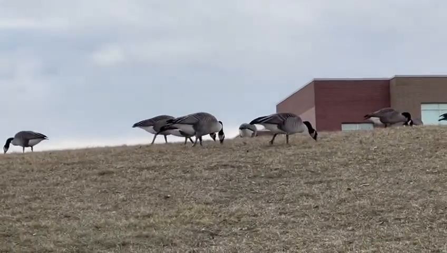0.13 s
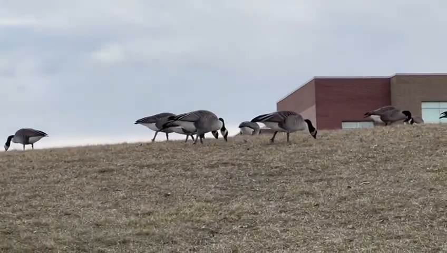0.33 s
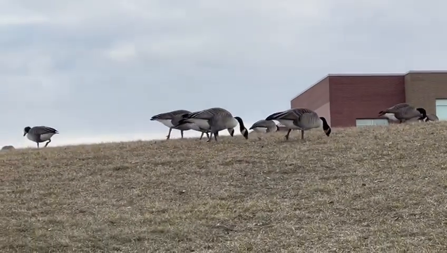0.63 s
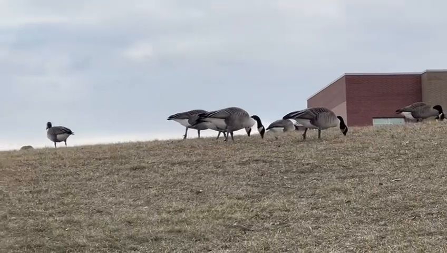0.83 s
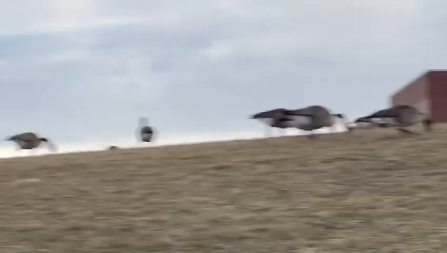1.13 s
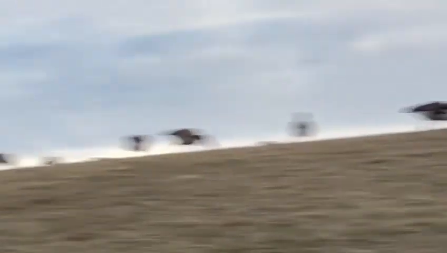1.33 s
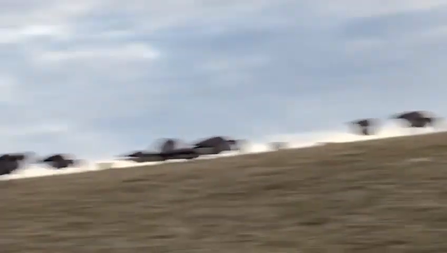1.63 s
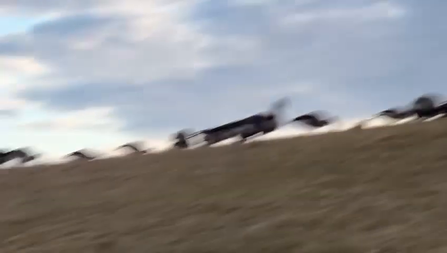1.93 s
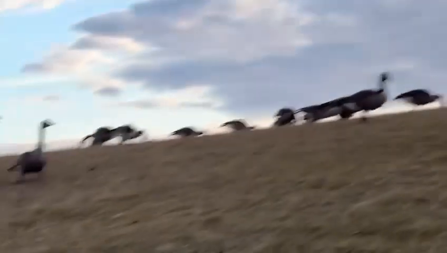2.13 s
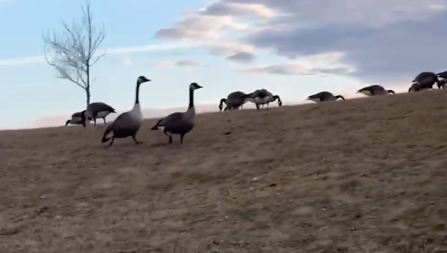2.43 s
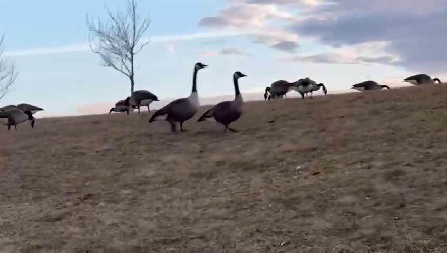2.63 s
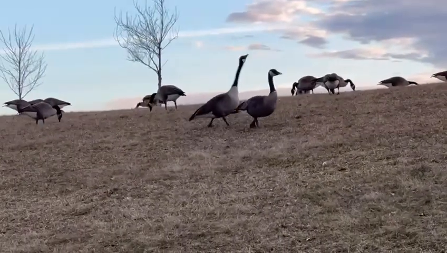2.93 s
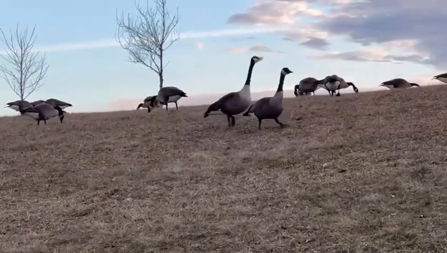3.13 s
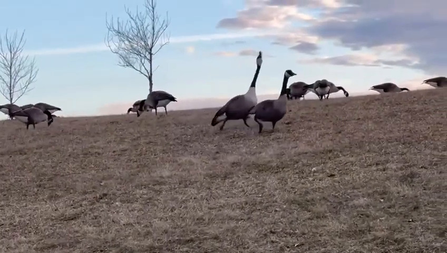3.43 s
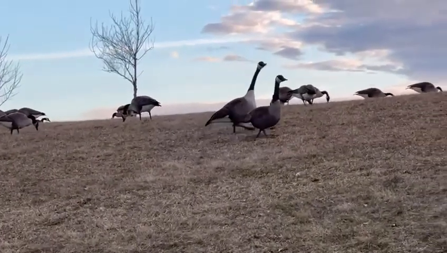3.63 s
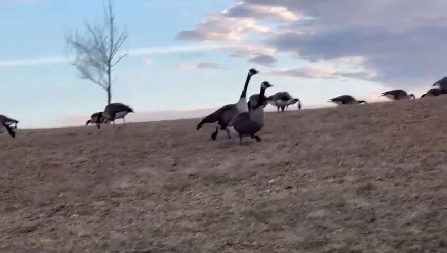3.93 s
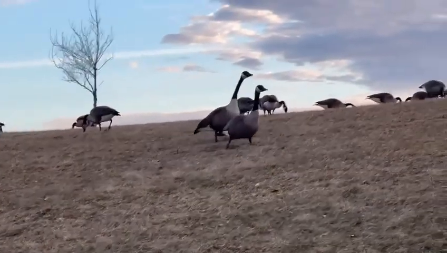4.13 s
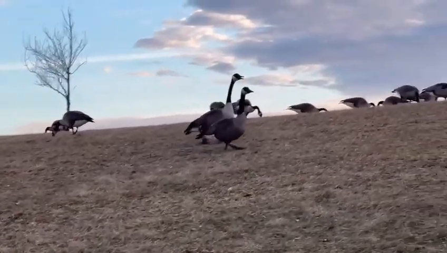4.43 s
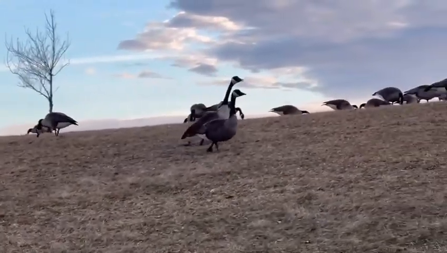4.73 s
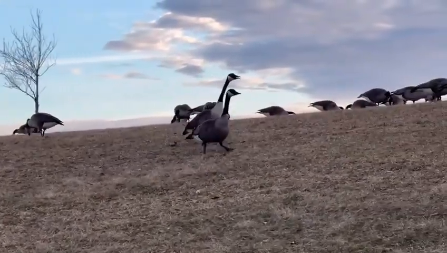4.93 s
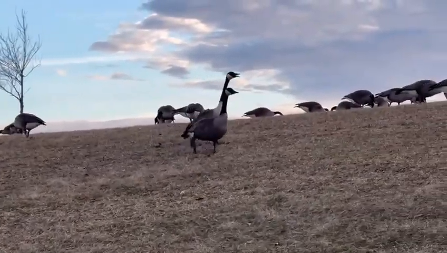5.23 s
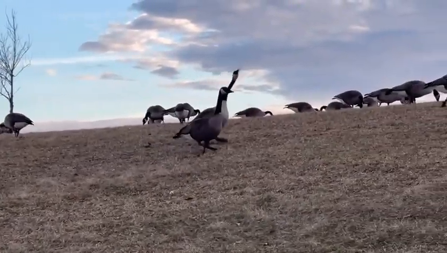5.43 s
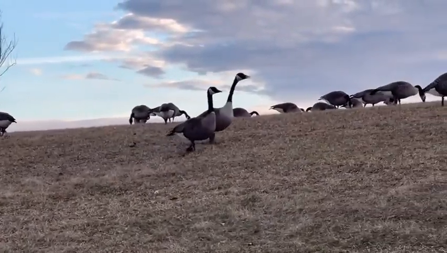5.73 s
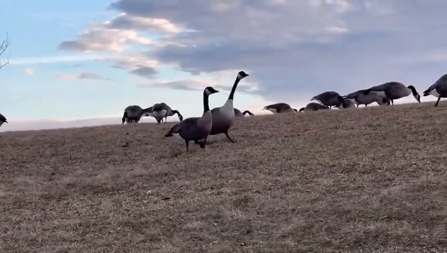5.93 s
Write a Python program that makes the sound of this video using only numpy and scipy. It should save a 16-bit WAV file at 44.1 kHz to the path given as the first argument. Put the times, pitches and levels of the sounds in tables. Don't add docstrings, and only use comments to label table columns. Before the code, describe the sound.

Outdoors on a dry lawn, a steady low rumble of far traffic and faint town murmur run throughout, the rumble rising very slightly. A goose honks at about 0.3, 0.7, 1.1, 1.6, 2.3, 2.7, 3.1, 3.4, 4.0, 4.4, 4.8, 5.2 and 5.7 seconds: each a short low rattling tone cracking up into a brief clear arched note. The honks are weaker around 2.3, then fuller and brighter. Faint dull echoes follow. Its mate's quiet, slow-pulsed grunts fill gaps before 1 second and again from 2.5 to 5.9. The geese sit left at first, shifting near centre by 2.3. Grass snaps and rustles from 1.3, densest at 3.2-4.0, then sparser until 5.4. A weak wind gust spans 1.3-1.85, with soft handling knocks at 1.4 and 2.25; a stronger, low gust hits the hand-held stereo microphone around 5.8-6.0.

```python
import sys
import numpy as np
from scipy import signal
from scipy.io import wavfile
from scipy.ndimage import uniform_filter1d

SR = 44100
rng = np.random.default_rng(int(sys.argv[2]) if len(sys.argv) > 2 else 0)


def store_pcm(level_fs):
    pcm = np.round(np.clip(level_fs, -1, 1) * 32767).astype(np.int16)
    wavfile.write(sys.argv[1], SR, np.atleast_2d(pcm).T)


def voltage_ratio(decibels):
    exponent = np.asarray(decibels, float) / 20
    return 10 ** exponent


N = 267731

# low start [t/s], voice breaks [t/s], clear note length [s], top pitch [f/Hz], [level/dB]
HONKS = [(0.297, 0.353, 0.052, 655, -34.5), (0.683, 0.741, 0.066, 659.6, -30.5),
         (1.083, 1.14, 0.057, 661, -30.5), (1.644, 1.707, 0.061, 621, -33),
         (2.277, 2.345, 0.047, 611.6, -35.5), (2.71, 2.767, 0.069, 654.5, -27.5),
         (3.058, 3.107, .087, 666.5, -26), (3.443, 3.492, 0.077, 671.2, -27),
         (3.985, 4.055, 0.083, 637.4, -29), (4.4, 4.455, 0.071, 654.7, -27),
         (4.843, 4.913, 0.071, 666, -26), (5.239, 5.294, 0.077, 665, -24),
         (5.677, 5.732, 0.071, 647.7, -27.5)]


def rms_one(x):
    return x / np.sqrt(np.mean(x ** 2) + 1e-20)


def butter(x, order, hz, kind="low"):
    return signal.sosfilt(signal.butter(order, hz, kind, fs=SR, output="sos"), x)


def resonance(x, hz, width_hz):
    r = np.exp(-np.pi * width_hz / SR)
    poles = [1, -2 * r * np.cos(2 * np.pi * hz / SR), r * r]
    return signal.lfilter(np.array([1, 0, -1]) * (1 - r * r) / 2, poles, x)


def in_time(rows):
    s, *columns = np.transpose(rows)
    return [np.interp(np.arange(N) / SR, s, c) for c in columns]


def at_hz(points, hz):
    points = np.array(points)
    return np.interp(np.log(hz), np.log(points[:, 0]), points[:, 1])


def drift(rate_hz):
    r = np.exp(-80 * np.pi * rate_hz / SR)
    slow = signal.lfilter([1], [1, -2 * r, r * r], rng.standard_normal(N // 40 + 2002))[2000:]
    return np.interp(np.arange(N) / 40, np.arange(len(slow)), rms_one(slow))


def calls(tables, tail_s):
    t = np.arange(N) / SR
    gate = np.zeros(N)
    held = []
    for rows in tables:
        opening = (t - rows[0][0]) / 0.0064
        closing = (rows[-1][0] - t) / tail_s
        gate += np.clip(np.minimum(opening, closing) + 1, 0, 1)
        held += [*rows, (rows[-1][0] + tail_s, *rows[-1][1:])]
    return in_time(held), gate


def rattle(per_s, throat, jitter, uneven_db, breath, follow):
    cycle = np.cumsum(per_s * (1 + jitter * drift(90))) / SR
    third = np.floor(3 * cycle)
    slaps = np.diff(third, prepend=0) * follow ** (third % 3) * voltage_ratio(uneven_db * rng.standard_normal(N))
    puffs = breath * np.exp(-1.8 * (cycle % 1)) * rng.standard_normal(N)
    joined = np.zeros(N)
    for k, (hz, width_hz, db) in enumerate(throat):
        rung = resonance(slaps + puffs * hz / 1500, hz, width_hz)
        rung = resonance(rung, hz, 1.64 * width_hz)
        joined += (-1) ** k * voltage_ratio(db) * rms_one(rung)
    return rms_one(butter(joined, 4, 7600))


def honk_starts():
    # pitch [f/Hz], opening [level/dB], rattle at break over note [dB],
    # gathers before break [s], open-bill hiss [dB]
    low = [(469, -38, 0.5, 0.0097, 7), (469, -43, -4.5, 0.013, 1), (475, -39, -4.5, 0.0068, 1),
           (476.4, -38, -.6, 0.014, 2.5), (474, -39.5, 2, 0.013, -5), (483, -36.5, -2.5, 0.0055, -2),
           (484.3, -32.5, -3.5, .016, 3), (482, -28.5, -3.5, 0.0089, 3), (468, -38, -1.5, 0.018, -1),
           (468, -36.5, -2.2, 0.011, -2.5), (486, -36, -5.5, 0.016, -1.2), (487, -35, -6.5, 0.0081, -0.5),
           (471.4, -32, -0.5, 0.012, 0.8)]
    # [f/Hz], width [Hz], [level/dB]
    throat = [(562, 151, -8), (1176, 160, 8), (1955, 395, -4), (4270, 1550, -7.5), (6600, 7700, -34.5)]
    partials_db = [-3.5, -8, -18, -17, -19.5]
    open_s, snap_s = 0.0057, 0.0024
    slack_db_per_s, gather_db = -300, -3
    slackens = .45
    tables = []
    for (s, crack_s, _, _, note_db), (hz, db, rise_db, lead_s, hiss_db) in zip(HONKS, low):
        tone_db = -39 + 0.27 * (db + 34)
        gather_s = crack_s - lead_s
        slack_db = slack_db_per_s * max(gather_s - s - .02, 0)
        top_db = note_db + rise_db
        slack_s = s + 0.0023 + open_s + slackens * (gather_s - s - .015)
        rows = [(s + .003, tone_db - 8.5, db - 1.2),
                (s + 0.0048 + open_s, tone_db, db + 1.0),
                (slack_s, tone_db, db + 0.68 * slack_db),
                (gather_s - snap_s, tone_db + 0.26 * slack_db, db + slack_db),
                (gather_s, tone_db, top_db + gather_db),
                (crack_s + .002, tone_db - 1.5, top_db)]
        tables.append([(t, hz * (.95 + .064 * (t - s) / (crack_s - s)), a, b, hiss_db) for t, a, b in rows])
    (pitch_hz, tone_db, rattle_db, hiss_db), gate = calls(tables, tail_s=.014)
    phase = 2 * np.pi * np.cumsum(pitch_hz * (1 + 0.01257 * drift(68.4))) / SR
    tone = sum(voltage_ratio(db + 2.86 * drift(180)) * np.cos(k * phase) for k, db in enumerate(partials_db, 1))
    rough = rattle(pitch_hz / 3, throat, jitter=.09, uneven_db=3, breath=.13, follow=.55)
    rough = rough + (voltage_ratio(hiss_db) - 1) * butter(rough, 2, 3300, "high")
    return gate * (np.sqrt(2) * voltage_ratio(tone_db) * tone + voltage_ratio(rattle_db + 1.0) * rough)


def honk_notes():
    partials_db = [-16.5, 0.5, -5, -22, -27.5, -12.5, -12.5, -16, -25, -23, -23.5, -35, -36, -36, -31.5,
                   -41.5, -44.5, -58.5]
    # [share of length], [pitch factor], [share of early sag], [level/dB]
    note_shape = [(0, .98, 0.19, -8.5), (.15, .998, 0, -0.96), (.42, 1.001, 0.44, -0.5),
                  (0.678, .999, 1.08, -2), (.86, 0.917, 0.35, -4.5), (1.001, .87, .6, -18.5)]
    # early sag [%], bill towards us [dB], partial 3 [dB], 4-5 [dB], 6 [dB]
    pose = [(3.9, 0, 4, 0.49, 7), (1.1, 12, 4, 0.35, 12), (3.3, 3.5, 3, .3, 7), (5.4, -1.5, -4.5, .3, -0.5),
            (4.94, -1.5, -4, 0.28, 0), (0.88, 5.5, -1, .3, 9), (0.42, 14.5, -0.3, .3, 9.5),
            (1.1, 2.5, -2.5, .3, -2.5), (5.65, -0.3, -2, .3, -9), (2.3, -3, -0.3, 0.27, -6),
            (4.85, 2.1, .3, .3, 2.5), (0.81, 1.5, -2.5, .3, 4), (3.2, 3.5, -0.5, .3, 2)]
    aim_share = (.55, 0.87, 1.44)
    overtones_die_db = 30
    out = np.zeros(N)
    air = rms_one(resonance(resonance(rng.standard_normal(N), 3670, 4400), 4000, 4682))
    tremble = 1 + .004 * drift(150)
    spread_rad = .05
    ragged = rms_one(butter(rng.standard_normal((3, N)), 2, [60, 330], "band"))
    share, factor, sagging, shape_db = np.transpose(note_shape)
    for (_, crack_s, length_s, hz, db), (early, facing_db, *neck_db) in zip(HONKS, pose):
        s = crack_s + share * length_s
        colour_db = [*neck_db, *np.multiply(aim_share, facing_db)]
        turn_db = np.repeat([0, *colour_db], [2, 1, 2, 1, 2, 3, 7])
        hoarse = .2 + .009 * max(665 - hz, 0)
        at = np.arange(round((s[0] - .004) * SR), round((s[-1] + 0.011) * SR))
        t = at / SR
        edge = np.clip(np.minimum(at - at[0], at[-1] - at) / (0.011 * SR), 0, 1)
        bend_hz = uniform_filter1d(np.interp(t, s, hz * (factor - sagging * early / 100)), size=300)
        level_db = uniform_filter1d(np.interp(t, s, db + shape_db), size=200)
        phase = 2 * np.pi * np.cumsum(bend_hz * tremble[at]) / SR
        sag = np.minimum(bend_hz / bend_hz.max() - 1, 0) * (at > at[bend_hz.argmax()])
        age_s = np.maximum(t - s[1] - .01, 0)
        swell_db = (level_db - level_db.max()) * (at < at[level_db.argmax()])
        for k, partial_db in enumerate(partials_db, 1):
            sway_db = .15 * k * np.interp(at, np.linspace(at[0], at[-1], 9), rng.standard_normal(9))
            fading_db = (overtones_die_db * k - 60 * (k == 1)) * sag
            fading_db = fading_db - 30 * max(k - 7, 0) * age_s + 0.12 * k * swell_db
            flutter = 1 + hoarse * min(k / 7, 1) ** 2 * ragged[k % 3, at]
            gain = voltage_ratio(level_db + 5.0 + partial_db + turn_db[k - 1] + sway_db + fading_db)
            out[at] += edge * flutter * gain * np.cos(k * phase - spread_rad * k * k)
        break_db = 14 * np.exp(-((t - s[1] + 0.0013) / 0.02) ** 2)
        air_db = level_db.max() - 36.5 + break_db + colour_db[4] - 160 * age_s
        out[at] += edge * voltage_ratio(air_db) * (1 + np.cos(phase)) * air[at]
    return out


def grunts():
    # start [t/s], length [s], [level/dB], fades by [dB], pulse rate [f/Hz]
    grunt_rows = [(0.038, 0.066, -52.5, 16, 164), (0.243, 0.041, -57.5, -9, 150),
                  (0.503, 0.083, -50.5, 12.5, 158), (0.863, .061, -48, 7, 152), (2.537, .08, -47, 6.5, 145),
                  (2.901, .074, -41, 8.5, 166), (3.285, .058, -38.5, 4.5, 163), (4.204, .064, -43, 3, 159),
                  (4.674, 0.091, -48, 0.5, 154), (5.052, .064, -43, 6, 149), (5.887, .068, -44.5, 3, 157)]
    # [f/Hz], width [Hz], [level/dB]
    throat = [(444, 285, -3), (1345, 320, 1), (2144, 1000, -11.5), (4840, 1800, -19.5)]
    tables = []
    for s, length_s, db, fade_db, hz in grunt_rows:
        swell = np.clip(.3 + 0.06 * (db + 46), .08, .6)
        tables.append([(s, db - 12, hz), (s + swell * length_s, db, hz), (s + length_s, db - fade_db, .96 * hz)])
    (level_db, per_s), gate = calls(tables, tail_s=.014)
    pulses = rattle(per_s, throat, jitter=.012, uneven_db=1.2, breath=.05, follow=.3)
    opened = resonance(pulses, 3230, 960) + 0.72 * resonance(pulses, 5600, 2200)
    facing_db = -2 - 3 * np.arange(N) / SR
    return gate * voltage_ratio(level_db + 0.76) * (pulses + 1.6 * voltage_ratio(facing_db) * opened)


def aside(geese):
    # [t/s], side [left 1, right -1]
    bearing = [(0, 1), (1.2, 1), (2.3, .16), (3.2, .24), (6.07, 0.083)]
    ported = resonance(geese, 1130, 990) + 0.033 * resonance(geese, 550, 400)
    ported = ported - .5 * resonance(geese, 2100, 480)
    return in_time(bearing)[0] * ported * [[.35], [-1]]


def echoes(x):
    # delay [t/s], [level/dB]
    returns = [
        (0.091, -29.5),
        (0.114, -46),
        (.15, -37.5),
        (.185, -40.5),
        (.225, -49.5),
        (.27, -48),
    ]
    reply = np.zeros((2, round(.36 * SR)))
    t = np.arange(1500) / SR
    for s, db in returns:
        i = round(s * SR)
        reply[:, i:i + 1500] += voltage_ratio(db - 28.5) * rng.standard_normal((2, 1500)) * np.exp(-t / 0.015)
        reply[[0, 1], [i, i + 9]] += voltage_ratio(db)
    far = resonance(resonance(x, 1320, 450), 1320, 900) + .08 * x
    near = voltage_ratio(-61.0) * rng.standard_normal(3000) * np.exp(-np.arange(3000) / SR / 0.12)
    walls = signal.fftconvolve(far[None], reply, axes=1)[:, :N]
    return walls + signal.fftconvolve(resonance(x, 6000, 3600), near)[:N]


def snaps():
    # [t/s], peak [level/dB], centre [f/Hz]
    stiff = [(1.2704, -46.5, 7640), (1.64, -43, 8040), (1.654, -45, 5610), (1.6864, -37, 5830),
             (1.9655, -41.5, 6600), (2.169, -38.5, 7900), (2.209, -44.5, 7050), (2.4487, -45, 7940),
             (2.5347, -39, 7500), (3.2052, -41, 6790), (3.2881, -41, 8045), (3.405, -38, 7380),
             (3.4125, -42, 8040), (3.7083, -44.5, 7740), (3.724, -43, 7300), (3.739, -41, 7640),
             (3.7651, -38, 6900), (3.8016, -42.5, 7840), (3.815, -44.5, 6400), (3.8302, -40.5, 7400),
             (3.8368, -39, 7640), (3.9522, -41.5, 7260), (3.9733, -33, 7760), (3.9911, -36.5, 6220),
             (4.5986, -40.5, 9160), (4.654, -38, 8350), (4.7876, -37, 6400), (4.804, -40.5, 5897),
             (5.1737, -46, 6090), (5.445, -41.5, 8050)]
    # [t/s], peak [level/dB]
    further = [(1.44, -55), (1.517, -53.5), (1.857, -54.5), (2.0311, -52.5), (2.092, -55), (2.1166, -49),
               (2.383, -38), (2.4202, -53), (2.5277, -48), (2.5433, -49), (2.5679, -48.5), (2.5766, -46.5),
               (2.5953, -47), (2.9976, -47), (3.0104, -49), (3.0259, -52), (3.0783, -44), (3.2247, -49.5),
               (3.2805, -45), (3.3483, -47), (3.6152, -49), (3.654, -49), (3.7344, -39), (3.7558, -47),
               (3.7943, -46), (3.9222, -52), (3.9335, -45), (4.13, -48), (4.5466, -54), (4.7534, -46.5)]
    out = np.zeros(N)
    t = np.arange(500) / SR
    breaks = [*stiff, *[(s, db, 6900 + 400 * rng.standard_normal()) for s, db in further]]
    for s, db, hz in breaks:
        burst = rng.standard_normal(500) * (np.exp(-t / 0.00023) + 0.31 * np.exp(-t / 0.0022))
        click = resonance(burst, hz + 600, 2000) + 0.29 * resonance(burst, 3200, 3000)
        i = round(s * SR) - 8
        out[i:i + 500] += voltage_ratio(db + 6.5) * click / np.abs(click).max()
    return out


def banded_noise(spectrum, patchy_db, speed_hz):
    # [f/Hz], [correlation]
    likeness = [(40, 1), (130, 0.97), (270, 0.94), (580, .6), (1230, 0.05), (2610, 0.89), (5540, 0.93)]
    lowest, highest = spectrum[0][0], spectrum[-1][0]
    edges = lowest * 2 ** np.arange(0, np.log2(highest / lowest) + .01, .5)
    edges = edges[edges < 15000]
    white = rng.standard_normal((2, 2, N))
    out = np.zeros((2, N))
    for k, (low, high) in enumerate(zip(edges, edges[1:])):
        centre_hz = np.sqrt(low * high)
        mid, side = butter(white[k % 2], 2, [low, high], "band")
        alike = np.clip(at_hz(likeness, centre_hz), 0, 1)
        gain = voltage_ratio(at_hz(spectrum, centre_hz) + patchy_db * drift(speed_hz))
        out += gain * (np.sqrt(1 + alike) * mid + np.sqrt(1 - alike) * side * [[1], [-1]])
    return rms_one(out)


def rustle():
    # [t/s], [level/dB]
    shuffle = [(0, -91), (1.15, -96), (1.5, -80.5), (1.85, -79.5), (2.1, -84), (2.85, -83.5), (3.2, -68.5),
               (3.38, -81.5), (3.6, -76.5), (4, -80), (4.3, -90), (4.75, -81), (5, -87.5), (6.07, -94.5)]
    # [f/Hz], [level/dB]
    spectrum = [(2100, -4), (3200, -6), (4500, -9), (7000, -5.5), (9000, -10), (10000, -29.5), (12000, -45)]
    level_db = in_time(shuffle)[0] + 8.5 + 2.6 * drift(25)
    return voltage_ratio(level_db) * banded_noise(spectrum, patchy_db=2.5, speed_hz=60)


def traffic():
    # [f/Hz], [level/dB]
    spectrum = [(15, -49), (25, -16), (60, 1.5), (92, 3), (136, -5.5), (320, -31), (420, -40.5),
                (700, -120)]
    level_db = -44.5 + .5 * np.arange(N) / SR
    return voltage_ratio(level_db + 2.5) * banded_noise(spectrum, patchy_db=2.0, speed_hz=7)


def town():
    # [f/Hz], [level/dB]
    spectrum = [(250, 4.5), (400, -5), (800, -5), (1300, -11), (1700, -16), (2200, -23), (2900, -33)]
    return voltage_ratio(-57) * butter(banded_noise(spectrum, patchy_db=0.33, speed_hz=9.6), 4, 2500)


def wind():
    # rises [t/s], full [t/s], eases [t/s], gone [t/s], [level/dB]
    gust_rows = [
        (1.29, 1.395, 1.718, 1.85, -32.5),
        (5.763, 5.867, 5.94, 6.02, -25),
    ]
    # [f/Hz], [level/dB]
    spectrum = [(28, -5.5), (55, 9), (120, -1.5), (230, -17), (450, -49.5)]
    rows = []
    for rises, full, eases, gone, db in gust_rows:
        rows += [(rises, db - 28.5), (full, db - 1.0), (eases, db), (gone, db - 26.5)]
    return voltage_ratio(in_time(rows)[0]) * banded_noise(spectrum, patchy_db=3.5, speed_hz=12)


def bumps():
    # [t/s], peak [level/dB]
    knocks = [
        (1.37, -41),
        (2.248, -33.5),
    ]
    clicks = np.zeros(N)
    for s, db in knocks:
        clicks[round(s * SR)] = voltage_ratio(db + 27.5)
    return resonance(butter(clicks + 1e-18, 4, 2200), 460, 580)


def scene():
    geese = honk_starts() + honk_notes() + grunts()
    geese = geese - 0.74 * resonance(geese, 3533, 1000)
    lawn = snaps() + rustle()
    return geese + aside(geese) + echoes(geese) + lawn + traffic() + town() + wind() + bumps()


def band_limit(x):
    return signal.sosfilt(signal.butter(12, 12380, fs=SR, output="sos"), x)


def record(dry):
    r, c = np.exp(-np.pi * 1400 / SR), np.cos(2 * np.pi * 9900 / SR)
    left = signal.lfilter([r * r, -2 * r * c, 1], [1, -2 * r * c, r * r], dry[0])
    top_cut = signal.cheby2(18, 60, 12450, fs=SR, output="sos")
    mix = signal.sosfilt(top_cut, [left, dry[1]])
    return band_limit(mix)


dry = scene()
out = record(dry)
store_pcm(out)
```